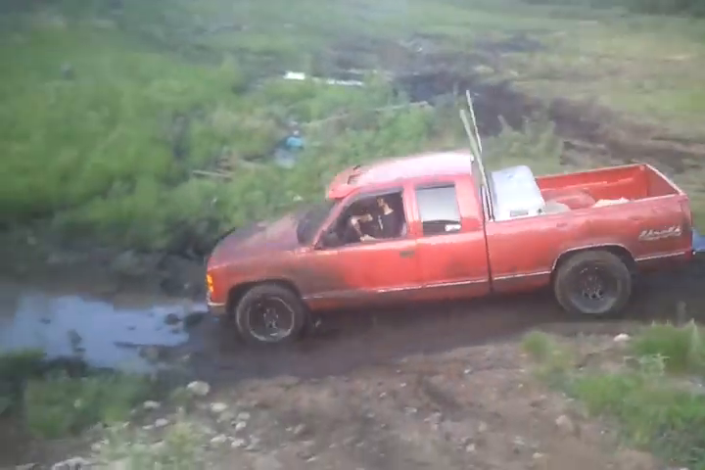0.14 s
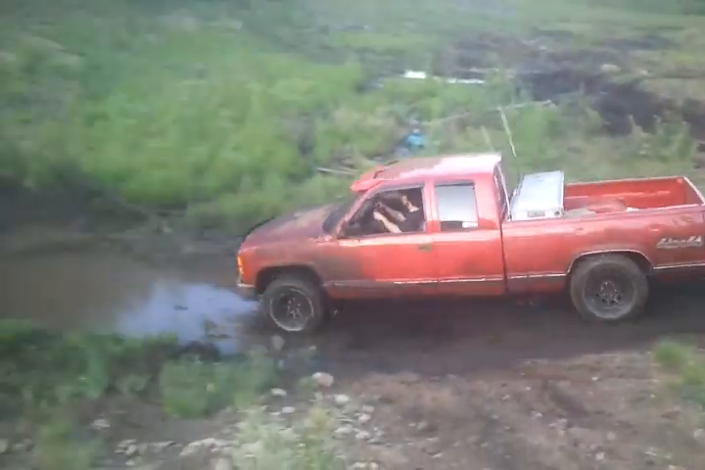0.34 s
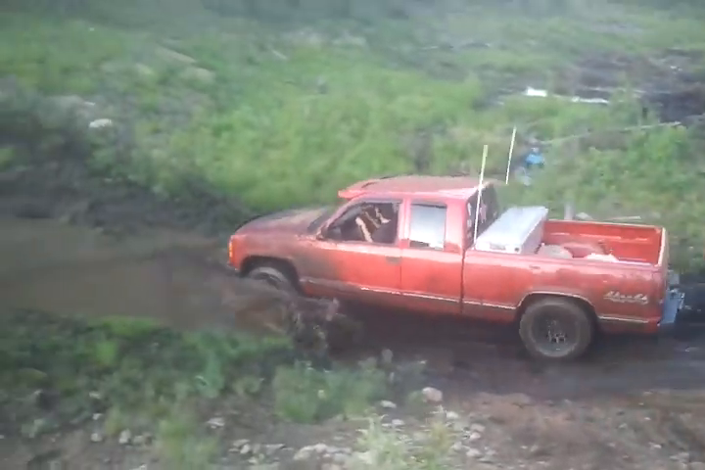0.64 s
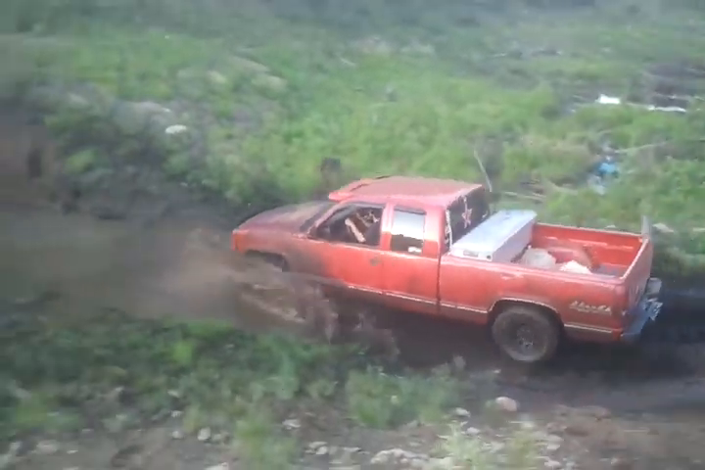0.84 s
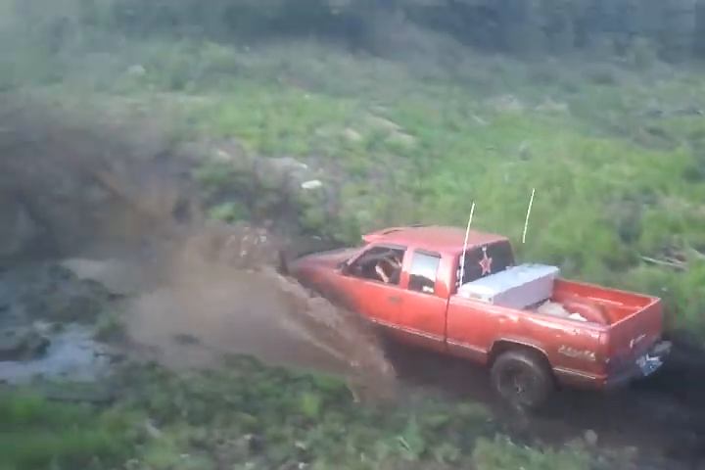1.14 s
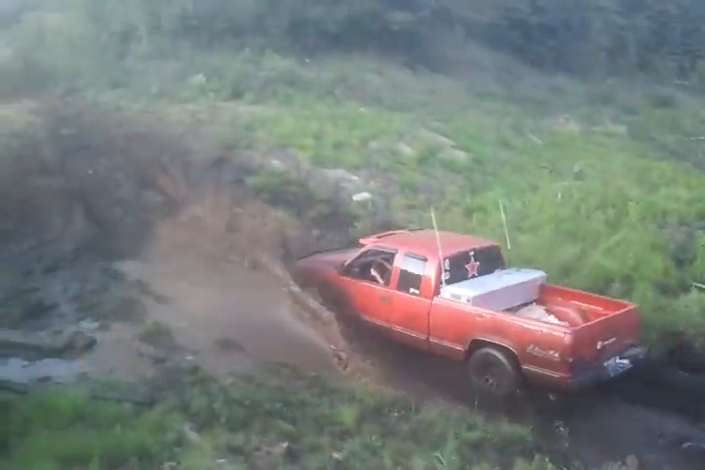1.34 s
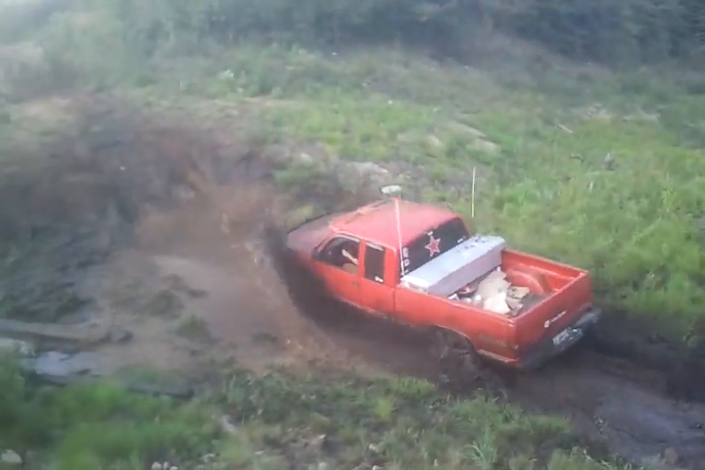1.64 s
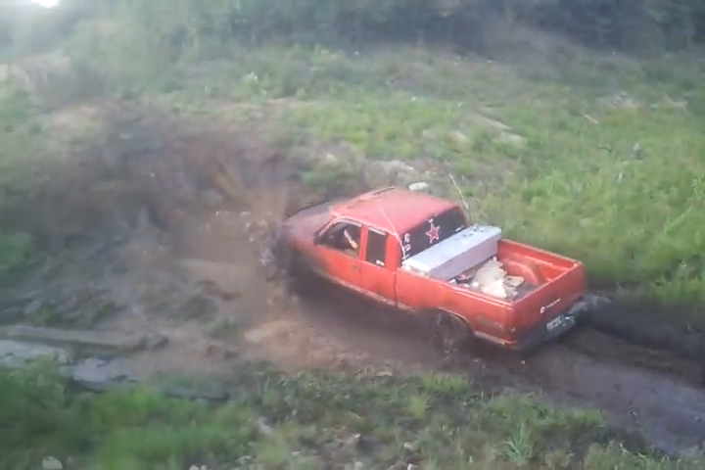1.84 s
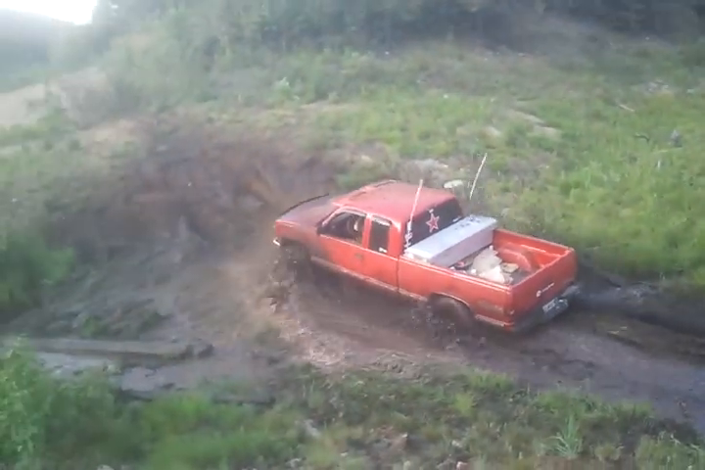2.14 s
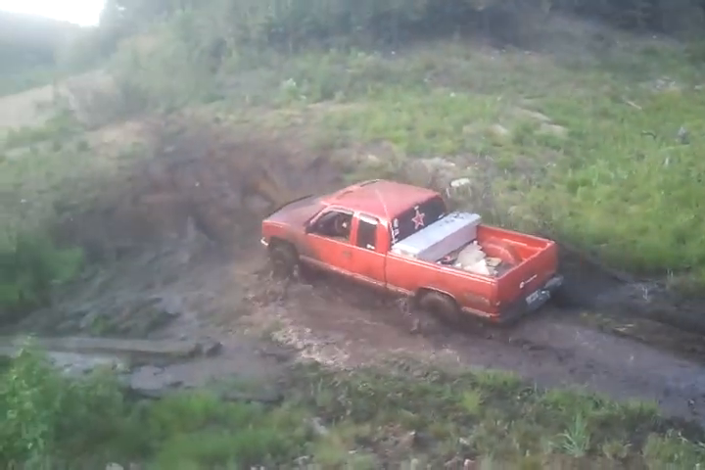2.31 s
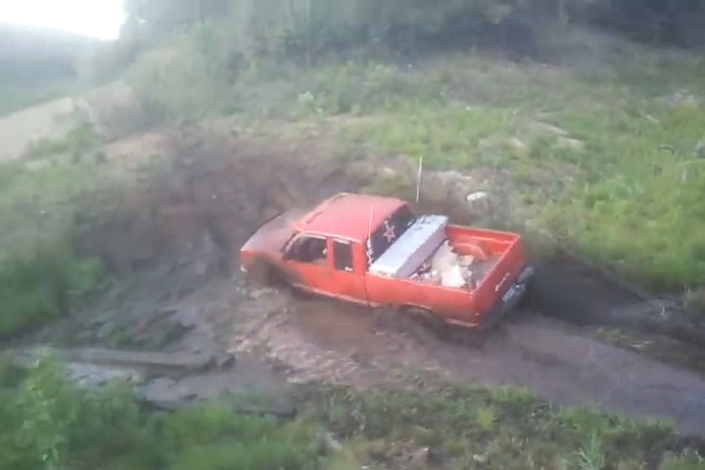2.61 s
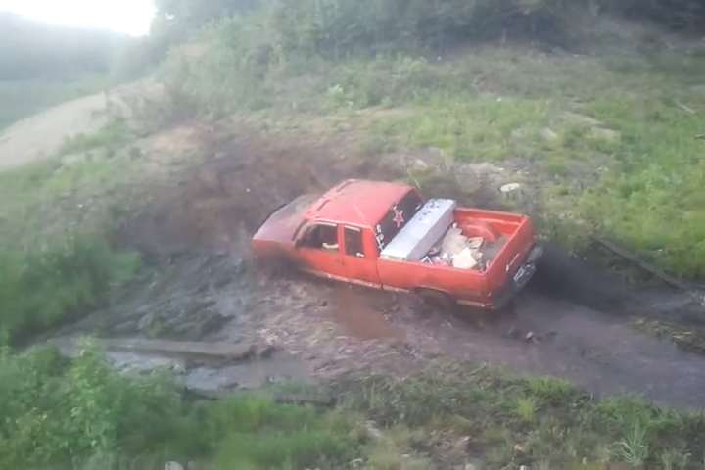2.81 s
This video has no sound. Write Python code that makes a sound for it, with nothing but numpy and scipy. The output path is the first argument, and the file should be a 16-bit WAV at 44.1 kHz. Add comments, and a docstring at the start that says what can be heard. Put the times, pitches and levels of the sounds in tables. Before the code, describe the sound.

A pickup's V8 with loud pipes idles low, then roars unevenly and climbs to a high, barking rasp, while water spray hisses and mud slaps; outdoors, dry, with the microphone overloading into harsh distortion.

```python
"""Revving V8 in a mud hole

A pickup with a V8 and loud pipes revs through a mud hole outdoors. Its note is a sum of sines locked to the engine
cycle: the two banks fire unevenly, so orders 3, 5, 11 and 13 lope beside the firing order 8.
Noise puffs through tailpipe resonances give the rasp, and one cylinder barks once a cycle, loudest at high revs.
Filtered noise and short rings make flow rumble, water spray, mud slaps and drops on metal; the input clips hard."""
import sys
import numpy as np
from scipy import signal
from scipy.io import wavfile

SR = 44100
rng = np.random.default_rng(int(sys.argv[2]) if len(sys.argv) > 2 else 0)


def wav_record(signal):
    """Record a signal, one row per channel, as 16-bit PCM in the file named by sys.argv[1]."""
    frames = np.transpose(np.atleast_2d(signal))
    bounded = np.clip(frames, -1, 1)
    # unit amplitude maps onto the largest positive 16-bit level
    quanta = np.round(bounded * 32767).astype(np.int16)
    wavfile.write(sys.argv[1], SR, quanta)


N = 130977

# Engine speed and strong orders. Each row: time in seconds, engine cycles per second,
# then the rms level in dB of orders 3, 5, 8, 11, 13, 6 and 9.
ENGINE_SPEED_AND_ORDERS = [(0.0, 15.4, -36, -24, -25, -29, -27, -38, -34),
                           (0.15, 13.8, -45, -23, -29, -35, -36, -45, -37),
                           (0.28, 13.4, -45, -23, -21, -35, -31, -45, -38),
                           (0.39, 14.6, -39, -24, -21, -33, -21, -35, -33),
                           (0.52, 17.3, -36, -18.5, -17, -41, -21.5, -41, -32),
                           (0.71, 19.5, -25, -25, -15, -24, -18.5, -29, -23),
                           (0.78, 20.6, -22, -17.5, -12.5, -22, -17, -27, -38),
                           (0.83, 21.2, -19, -13.5, -14, -20, -19.5, -30, -28),
                           (0.99, 19.9, -26, -14.5, -10, -22, -9, -41, -52),
                           (1.11, 19.6, -16, -12.5, -10, -13.5, -6, -42, -16),
                           (1.22, 20.1, -18, -16.5, -9.5, -35, -8.5, -47, -42),
                           (1.39, 20.9, -24, -12.5, -9.5, -12.5, -13.5, -28, -18),
                           (1.5, 20.8, -23, -9, -7, -23, -19.5, -39, -36),
                           (1.68, 19.3, -18, -17, -13, -19.5, -18.5, -26, -33),
                           (1.82, 19.6, -23, -17, -18, -23.5, -19, -24, -26),
                           (1.98, 20.5, -21, -14.5, -11.5, -29.5, -28, -26, -35),
                           (2.13, 21.8, -23, -13, -15.5, -16, -15, -26, -25),
                           (2.26, 23.6, -24, -13.5, -22, -22.5, -22, -50, -15),
                           (2.42, 26.0, -25, -14.5, -8.5, -10, -42, -41, -46),
                           (2.51, 26.9, -20, -14, -13.5, -8.5, -29, -29, -28),
                           (2.67, 28.9, -17.5, -22.5, -22, -23.5, -62, -16, -16),
                           (2.8, 29.8, -18.5, -16, -14, -53, -59, -17, -17.5),
                           (2.88, 30.0, -18, -21, -19, -32, -42, -17, -19.5),
                           (2.97, 30.3, -19, -19, -19, -32, -42, -17, -22)]
# Multiples of the engine cycle rate, in the order of the level columns above.
STRONG_ORDERS = (3, 5, 8, 11, 13, 6, 9)
# Weak orders, which follow the load. Each row: order, level in dB against the load, before the muffler cut.
WEAK_ORDERS = [(4, -24), (7, -16.5), (10, -17.5), (12, -11), (14, -35), (15, -19.5), (16, -17), (18, -18.5),
               (19, -16), (20, -31), (21, -15.5), (22, -15)]
# Load, the reference for weak orders and rumble. Each row: time in seconds, level in dB.
LOAD = [(0.0, -19.5), (0.3, -16.5), (1.02, -8), (1.52, -8.5), (1.86, -29.5), (2.03, -16.5), (2.3, -14),
        (2.47, -14), (2.57, -11.5), (2.97, -20.5)]
# Which bank fires, as a sign, in firing order.
BANK_SIGNS = (1, -1, -1, 1, -1, 1, 1, -1)
# Moments in seconds when the loud cylinder fires; they keep the cycle count in step.
BARK_TIMES_S = [.507, .6732, .7779, .967, 1.1184, 1.415, 1.8111, 1.9133, 2.012, 2.107, 2.363, 2.4414,
                2.6943, 2.9292]
# Bark of the loud cylinder. Each row: time in seconds, level in dB.
BARK_LEVEL = [(0.0, -61), (0.11, -38), (0.16, -67), (0.46, -51), (0.51, -30), (0.56, -33), (0.74, -49),
              (0.83, -32), (1.13, -38), (1.41, -30), (1.65, -32), (1.9, -31.5), (2.3, -35), (2.4, -27),
              (2.44, -19), (2.52, -17), (2.97, -21)]
# Bright edge of the bark. Each row: time in seconds, level in dB against the bark.
CRACK_LEVEL = [(2.4, -31), (2.45, -22), (2.64, -19.5), (2.75, -21)]
# Rasp of all firings. Each row: time in seconds, then the drive in dB, before RASP_GAIN_DB,
# of the pipe's low, middle and high resonances.
RASP_DRIVE = [(0.0, -43, -48, -32.5), (0.19, -71, -40, -32.5), (0.4, -32, -52, -32),
              (0.64, -26.5, -46, -42), (0.83, -27, -17, -30), (1.24, -20, -54, -25), (1.4, -21, -19.5, -23),
              (1.55, -47, -17.5, -44), (1.67, -42, -58, -41), (1.89, -24, -55, -62),
              (2.09, -16.5, -21, -61), (2.42, -25, -22.5, -20), (2.57, -17, -16, -23),
              (2.66, -21.5, -20, -21), (2.97, -13, -23, -20)]
# Puff strength in dB of each cylinder, in firing order.
PUFF_BY_CYLINDER_DB = [5, -2, 0, 0.5, -16, 1.5, -5, 0]
# Index of the rasp drive column (0 low, 1 middle, 2 high) for each pipe resonance.
RASP_COLUMN = (0, 0, 1, 1, 2, 2, 2, 2)
# Tailpipe resonances. Each row: centre in Hz, width in Hz before PIPE_WIDEN, relative level in dB.
TAILPIPE_MODES = [(549, 140, -3), (704, 176, 5), (1000, 240, -6), (1290, 202, 4.5), (1832, 138, 1),
                  (2395, 400, -2.5), (4830, 1100, -2.5), (7600, 2100, -18)]
# Spectrum of rough exhaust flow. Each row: frequency in Hz, relative density in dB per Hz.
RUMBLE_SPECTRUM = [(15, -45), (25, -15), (49, -2), (86, 0), (146, -6), (205, -5), (500, -30), (650, -60),
                   (1000, -110)]
# Water spray. Each row: time in seconds, level of the hiss in dB.
SPRAY_LEVEL = [(0.0, -37), (0.35, -32.5), (0.69, -26.5), (0.85, -25.5), (1.15, -28), (1.44, -25.5),
               (1.94, -26.5), (2.45, -25), (2.97, -27)]
# Spectrum of the spray hiss. Each row: frequency in Hz, relative density in dB per Hz.
SPRAY_SPECTRUM = [(350, -0.5), (600, 1), (687, -18), (766, -6.5), (1110, -3), (1340, -8), (1560, -6),
                  (2040, -6), (2340, -8), (3200, -24.5), (4880, -13.5), (5590, -20), (11500, -22.5),
                  (14700, -38), (15500, -53)]
# Mud slapping the wheel arches. Each row: time in seconds, level in dB before the envelope, length scale in seconds.
MUD_SLAPS = [(0.082, -33.5, 0.099), (0.223, -36, 0.033), (0.37, -34, 0.073), (1.413, -32, 0.052)]
# Single drops on sheet metal. Each row: start in seconds, level in dB before decay, frequency in Hz.
METAL_TICKS = [(0.1705, -25, 5100), (0.6604, -27, 5420), (0.9414, -22.5, 6370), (1.3838, -22, 5480)]

# Weak orders fall above the muffler cut, by the full amount from 1.2 times its frequency
MUFFLER_CUT_HZ, ABOVE_CUT_DB = 365, -20
PIPE_LAG_S = 0.0017
# The pulses dip, then rise steeply; their shape turns as revs leave cruising speed (engine cycles per s)
PULSE_SKEW_RAD, SKEW_RAD_PER_HZ, CRUISE_HZ = -1.76, -.11, 20
# Orders 8 and 16 lead more as revs rise
FIRING_LEAD_RAD, LEAD_RAD_PER_HZ = -.76, .24
WOBBLE_DB, JITTER_RAD, LOOSE_RAD = .8, .015, .6
BARK_SPREAD_DB, PUFF_SPREAD_DB = 1, 2
BARK_HOLD_S, BARK_TAIL_S = 0.003, 0.0052
BARK_CLICK_DB, PUFF_CLICK_DB = 7, 24  # clean pressure step at the head, against the noise
CRACK_HZ, CRACK_WIDTH_HZ, CRACK_TAIL_S = 6500, 9000, .004
RASP_GAIN_DB, RASP_TAIL_S = 29, .004
PIPE_WIDEN, MODE_WANDER_DB = 1.7, 1.5
RUMBLE_DB = -21  # against the load
DROPS_PER_S, DROPS_DB = 900, -15  # median rate; level against the hiss
CLIP_AT = .69
LOWPASS_HZ = 14650


def amp(db):
    """The decibel law: 20 dB is a factor of ten in amplitude."""
    return 10 ** (np.asarray(db) / 20)


def rms_one(x):
    """Normalisation of the mean power to one."""
    return x / np.sqrt(np.mean(x ** 2) + 1e-20)


def in_time(rows):
    """Linear interpolation of each table column over all samples."""
    s, *columns = np.transpose(rows)
    return [np.interp(np.arange(N) / SR, s, c) for c in columns]


def drift(rate_hz):
    """Low-passed random fluctuation: a slow wander of rms 1, computed every 40 samples."""
    r = np.exp(-2 * np.pi * rate_hz * 40 / SR)
    white = rng.standard_normal(N // 40 + 2002)
    slow = signal.lfilter([1], [1, -2 * r, r * r], white)[2000:]  # drop the filter's start
    return np.interp(np.arange(N) / 40, np.arange(len(slow)), rms_one(slow))


def resonate(x, hz, width_hz):
    """Two-pole resonance: energy decays at a rate set by the width; the peak gain is 1."""
    r = np.exp(-np.pi * width_hz / SR)
    poles = [1, -2 * r * np.cos(2 * np.pi * hz / SR), r * r]
    return signal.lfilter([(1 - r * r) / 2, 0, (r * r - 1) / 2], poles, x + 1e-18)


def coloured(spectrum, patchy_db):
    """Band synthesis: third-octave noise bands, each with its own level and flicker, sum to rms 1."""
    hz, db = np.transpose(spectrum)
    edges = np.exp(np.arange(np.log(hz[0]), np.log(hz[-1]), np.log(2) / 3))
    white = rng.standard_normal((2, N))  # neighbouring bands use different noise
    together = drift(18)
    out = 0
    for k, (low, high) in enumerate(zip(edges, edges[1:])):
        sos = signal.butter(2, [low, high], "band", fs=SR, output="sos")
        band = signal.sosfilt(sos, white[k % 2])
        level_db = np.interp(np.log(low * high) / 2, np.log(hz), db)
        out = out + band * amp(level_db + patchy_db * (together + drift(5)))
    return rms_one(out)


def crank(rate):
    """Phase as the integral of speed: engine cycles are counted, and made whole at every listed bark."""
    cycles = np.cumsum(rate) / SR
    at = (np.array(BARK_TIMES_S) * SR).astype(int)
    whole = np.r_[0, np.cumsum(np.round(np.diff(cycles[at])))]
    return cycles + np.interp(np.arange(N), at, whole - cycles[at])


def exhaust_note(cycles, rate, strong_db, load_db):
    """Fourier synthesis: each order is a sine, phased by firing order and pipe; most weak ones wander in phase."""
    levels = dict(zip(STRONG_ORDERS, strong_db))
    for order, db in WEAK_ORDERS:
        above_cut = np.clip(order * rate / MUFFLER_CUT_HZ - 1, 0, .2) * 5
        levels[order] = load_db + db + ABOVE_CUT_DB * above_cut + 2 * WOBBLE_DB * drift(3.7)
    loose = {}
    for order, _ in WEAK_ORDERS:
        if order % 8:
            loose[order] = rng.uniform(0, 2 * np.pi) + LOOSE_RAD * drift(3.04)

    # bank signs plus a ramp over the eight firings set the phase of each order
    pattern = np.angle(np.fft.fft(np.array(BANK_SIGNS) - .3 * np.arange(8)))
    turn = 2 * np.pi * (cycles - PIPE_LAG_S * rate) + JITTER_RAD * drift(23)
    skew = PULSE_SKEW_RAD + SKEW_RAD_PER_HZ * (rate - CRUISE_HZ)
    lead = FIRING_LEAD_RAD + LEAD_RAD_PER_HZ * rate
    note = 0
    for k, db in levels.items():
        phase = k * turn + pattern[k % 8] + skew + loose.get(k, 0)
        if k % 8 == 0:
            phase = phase + lead
        note = note + np.sqrt(2) * amp(db + WOBBLE_DB * drift(10)) * np.cos(phase)
    return note


def tailpipe(burst, shift_db):
    """Modal filtering: pipe resonances of alternating sign wax and wane, each shifted by its own shift_db."""
    out = 0
    for k, (hz, width, db) in enumerate(TAILPIPE_MODES):
        level = amp(db + shift_db[k] + MODE_WANDER_DB * drift(4.6))
        once = resonate(burst, hz, PIPE_WIDEN * width)
        twice = resonate(once, hz, PIPE_WIDEN * width)
        out = out + (-1) ** k * level * twice / np.sqrt(width)
    return out


def firing_impulses(cycles):
    """Periodic excitation: an impulse at each of eight firings a cycle, and apart from them the loud cylinder's."""
    firing = np.floor(8 * cycles).astype(int)
    starts = np.flatnonzero(np.diff(firing)) + 1
    cylinder = firing[starts] % 8
    kicks, puffs = np.zeros((2, N))
    spread = rng.standard_normal((N, 2))[:len(starts)]
    kicks[starts] = (cylinder == 0) * amp(BARK_SPREAD_DB * spread[:, 0])
    puffs[starts] = amp(np.array(PUFF_BY_CYLINDER_DB)[cylinder] + PUFF_SPREAD_DB * spread[:, 1])
    return kicks, puffs


def bark(kicks):
    """Source and filter: the loud cylinder's noise bursts and steps ring the pipe, with a bright crack on top."""
    t = np.arange(2000) / SR
    hold_and_fall = np.exp(-np.maximum(t - BARK_HOLD_S, 0) / BARK_TAIL_S)
    noise = np.convolve(kicks, hold_and_fall)[:N] * np.sign(rng.standard_normal(N))
    burst = noise + amp(BARK_CLICK_DB) * kicks
    body = rms_one(tailpipe(burst, np.zeros(len(TAILPIPE_MODES))))
    crack_noise = np.convolve(kicks, np.exp(-t / CRACK_TAIL_S))[:N] * rng.standard_normal(N)
    crack = rms_one(resonate(crack_noise, CRACK_HZ, CRACK_WIDTH_HZ))
    return amp(in_time(BARK_LEVEL)[0]) * (body + amp(in_time(CRACK_LEVEL)[0]) * crack)


def rasp(puffs):
    """Source and filter: every firing sends a decaying noise puff and a pressure step through the tailpipe."""
    t = np.arange(2000) / SR
    noise = np.convolve(puffs, np.exp(-t / RASP_TAIL_S))[:N] * rng.standard_normal(N)
    burst = rms_one(noise + amp(PUFF_CLICK_DB) * puffs)
    drive_db = np.array(in_time(RASP_DRIVE))[list(RASP_COLUMN)]
    return amp(RASP_GAIN_DB) * tailpipe(burst, drive_db)


def flow_rumble(load_db):
    """Flow noise: rough exhaust flow is low, patchy noise whose level follows the load."""
    return amp(load_db + RUMBLE_DB) * coloured(RUMBLE_SPECTRUM, patchy_db=2)


def spray():
    """Random superposition: flung water is a patchy hiss with many short ringing droplet grains in it."""
    sizes = amp(0.43 * np.minimum(rng.exponential(1, N), 3)) * rng.choice([-1, 1], N)
    born = rng.random(N) < DROPS_PER_S * amp(4.0 * drift(5)) / SR
    dealt = rng.integers(0, 16, N)  # each grain takes one of 16 pitches
    drops = 0
    for k, hz in enumerate(np.geomspace(900, 9000, 16)):
        drops = drops + resonate(sizes * born * (dealt == k), hz, hz / 9) / np.sqrt(hz)
    hiss = coloured(SPRAY_SPECTRUM, patchy_db=1.23)
    return amp(in_time(SPRAY_LEVEL)[0]) * (hiss + amp(DROPS_DB) * rms_one(drops))


def mud_slaps():
    """Impact noise: bright puffs with a quick rise and a longer fall."""
    t = np.arange(N) / SR
    swell = 0
    for s, db, length in MUD_SLAPS:
        rise = np.clip((t - s) / length + 0.66, 0, 1)
        fall = np.exp(-np.maximum(t - s - 0.22 * length, 0) / (0.55 * length))
        swell = swell + amp(db) * rise * fall
    broad = resonate(rng.standard_normal(N), 3850, 4100)
    narrow = resonate(rng.standard_normal(N), 4800, 900)
    return swell * rms_one(broad + .5 * narrow)


def metal_ticks():
    """Damped free vibration: each drop on sheet metal is a short, dull, decaying sine."""
    out = np.zeros(N)
    t = np.arange(600) / SR
    for s, db, hz in METAL_TICKS:
        i = int(s * SR)
        out[i:i + 600] += amp(db) * np.exp(-t / 0.004) * np.sin(2 * np.pi * hz * t)
    return out


def scene():
    """Linear superposition of all sources, with engine sounds sharing one cycle count."""
    rate, *strong_db = in_time(ENGINE_SPEED_AND_ORDERS)
    cycles = crank(rate)
    load_db, = in_time(LOAD)
    rumble = flow_rumble(load_db)
    note = exhaust_note(cycles, rate, strong_db, load_db)
    kicks, puffs = firing_impulses(cycles)
    engine = note + rumble + bark(kicks) + rasp(puffs)
    mud_and_water = spray() + mud_slaps() + metal_ticks()
    return (engine + mud_and_water)[None]


def record(dry):
    """Amplitude limiting and band limiting: the input clips hard, then a steep low-pass cuts the top."""
    clipped = np.clip(dry, -CLIP_AT, CLIP_AT)
    lowpass = signal.ellip(10, .5, 70, LOWPASS_HZ, fs=SR, output="sos")
    return signal.sosfilt(lowpass, clipped)


dry = scene()
out = record(dry)
wav_record(out)
```